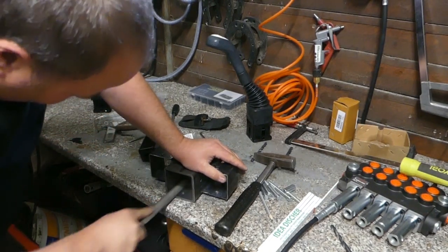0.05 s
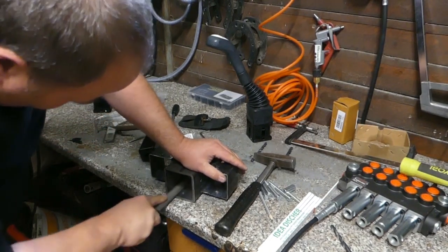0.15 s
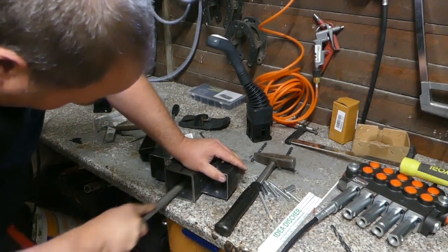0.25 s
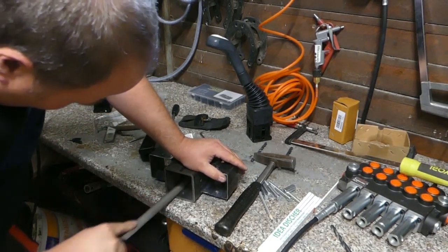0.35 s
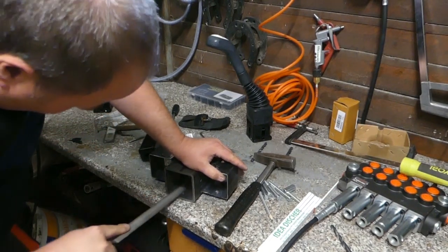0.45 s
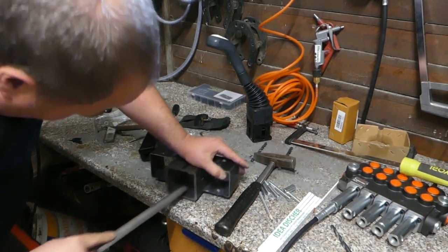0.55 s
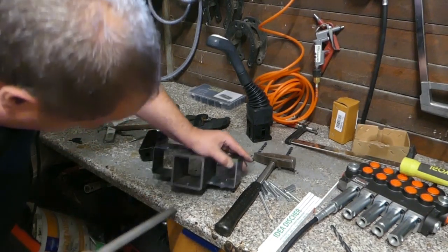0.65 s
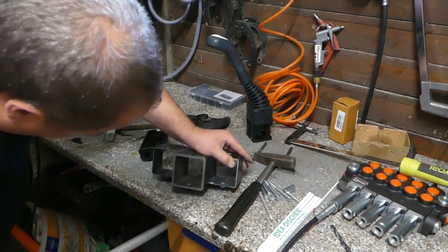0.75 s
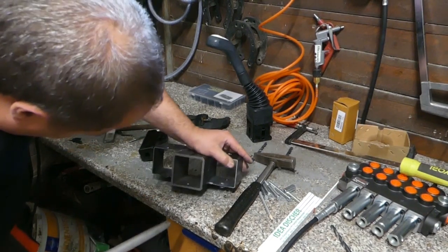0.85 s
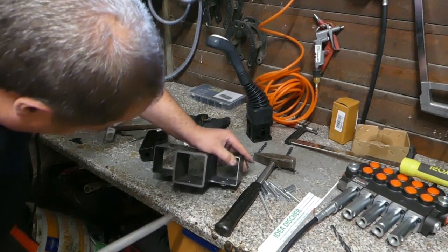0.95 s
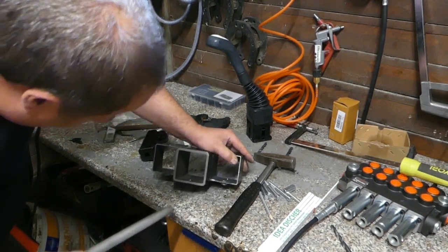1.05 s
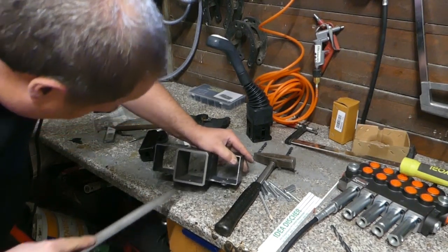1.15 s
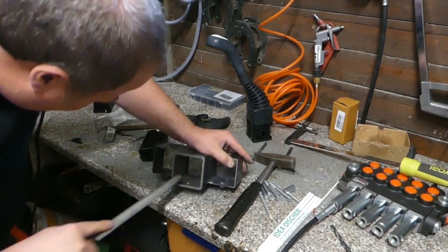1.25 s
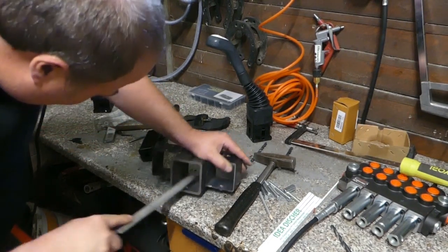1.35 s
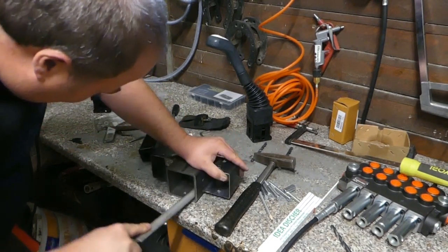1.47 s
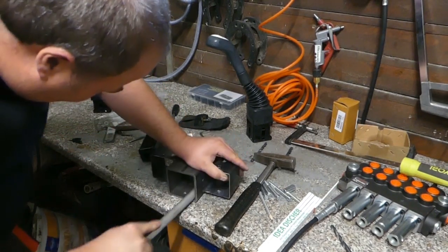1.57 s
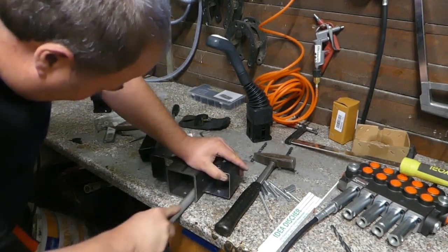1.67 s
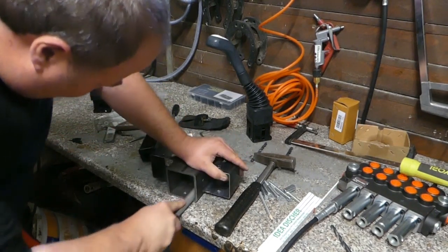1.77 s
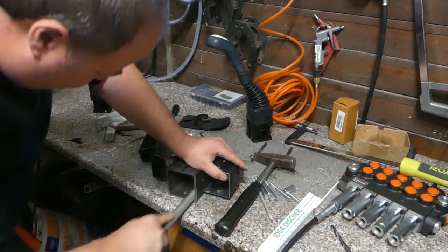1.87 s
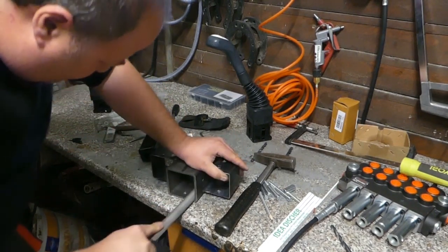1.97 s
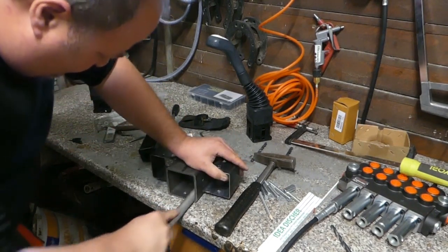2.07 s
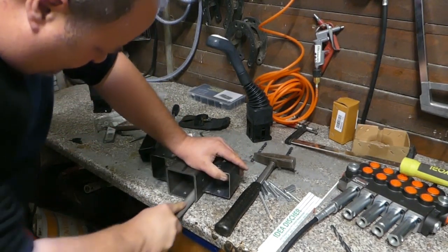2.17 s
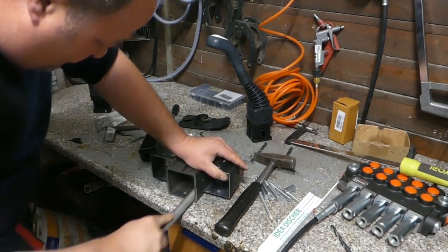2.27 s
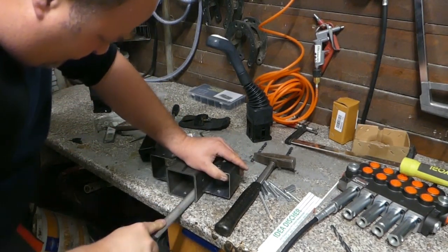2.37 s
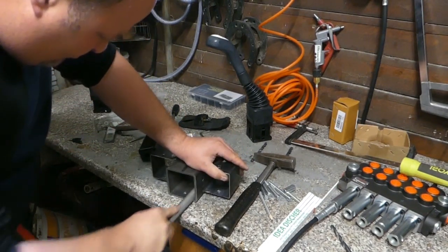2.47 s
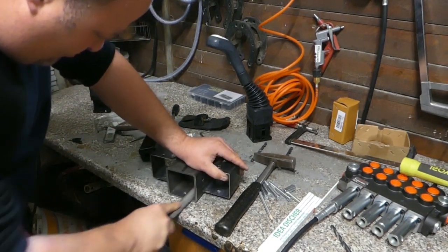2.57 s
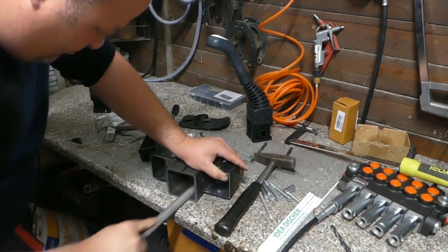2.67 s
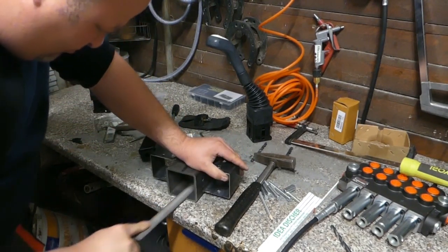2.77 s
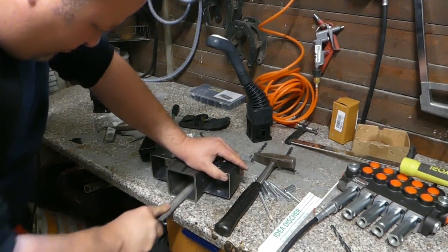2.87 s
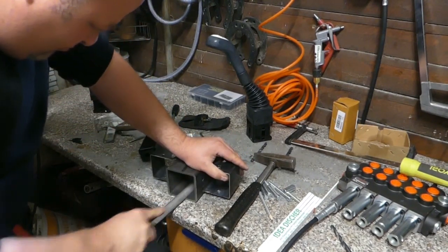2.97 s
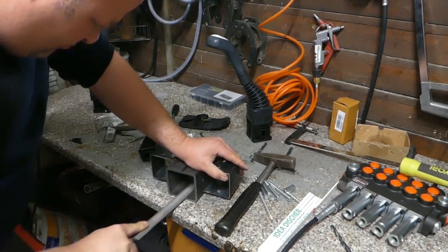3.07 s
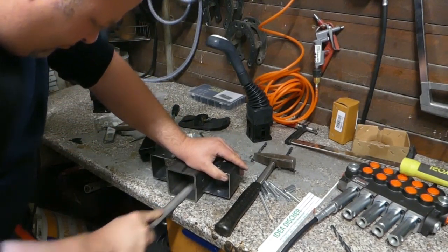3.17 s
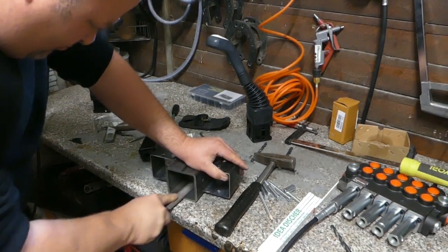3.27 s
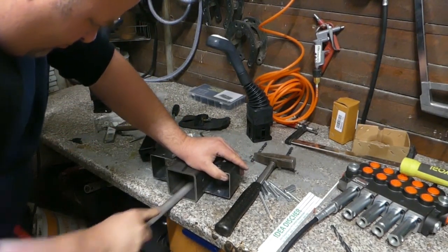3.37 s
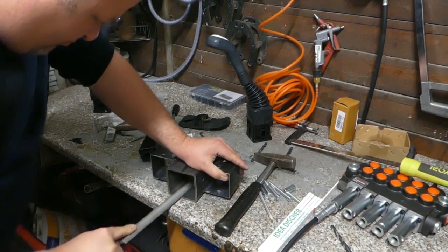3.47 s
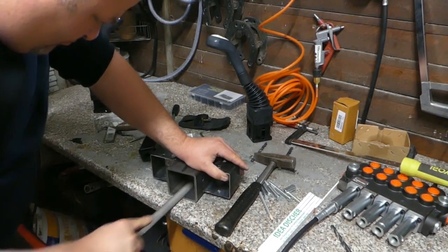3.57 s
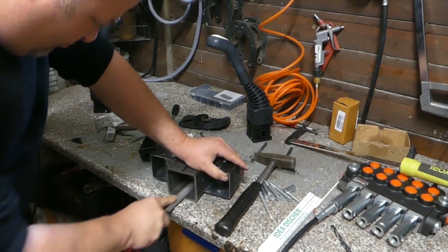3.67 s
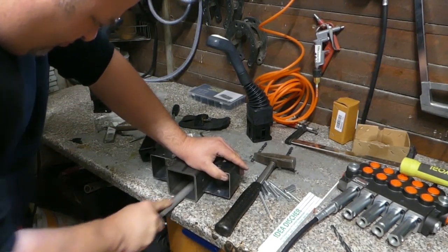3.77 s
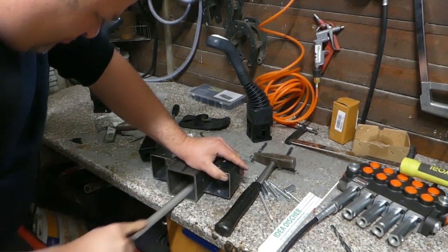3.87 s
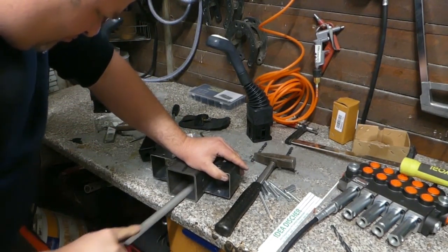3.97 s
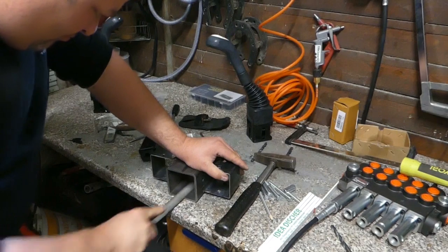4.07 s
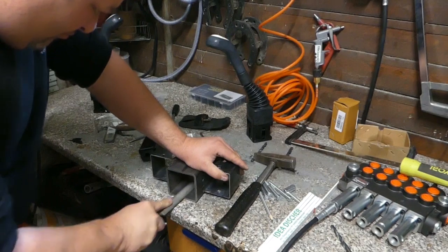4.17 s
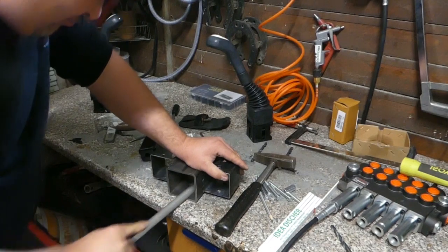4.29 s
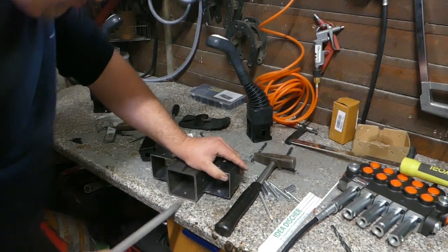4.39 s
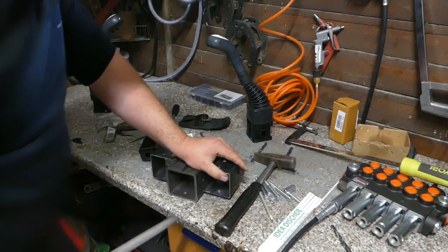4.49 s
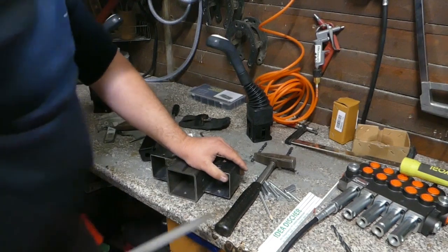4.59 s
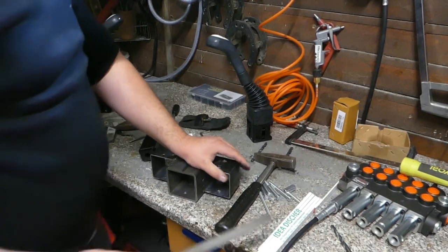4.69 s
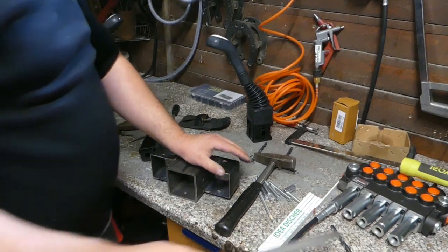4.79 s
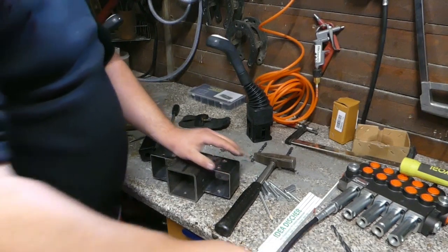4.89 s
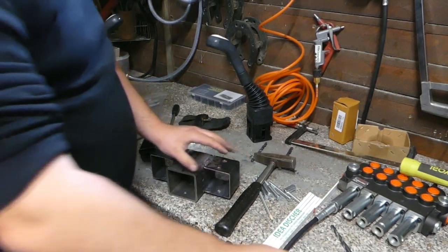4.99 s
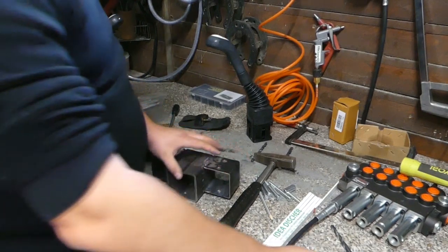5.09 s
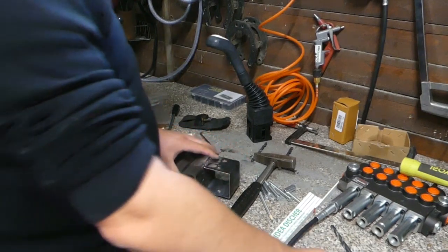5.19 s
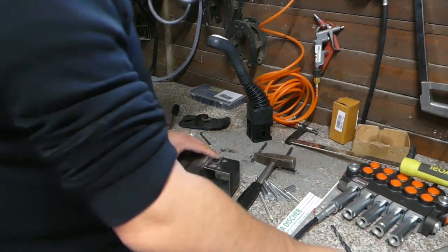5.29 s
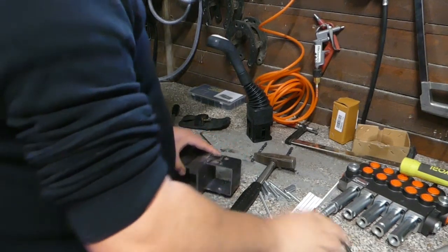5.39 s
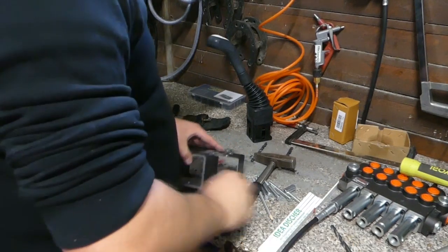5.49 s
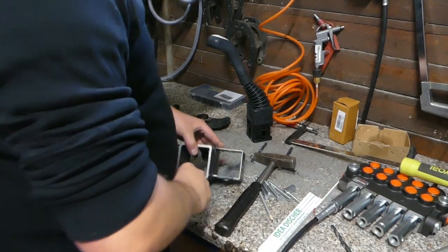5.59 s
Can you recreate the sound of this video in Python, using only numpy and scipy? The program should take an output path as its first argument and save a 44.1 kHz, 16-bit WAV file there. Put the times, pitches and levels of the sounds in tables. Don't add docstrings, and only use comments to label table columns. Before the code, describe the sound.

In a small workshop, a file strokes rapidly inside a hollow steel tube, gritty and squealing. It pauses while the part is shifted and thumped down, then the filing resumes for about three seconds. The file lifts out with a brief ring, a sleeve rustles, and steel clanks sharply on the stone bench. Close stereo camera microphone, faint hum and hiss.

```python
import sys
import numpy as np
from scipy import signal
from scipy.fft import rfft, irfft, next_fast_len
from scipy.io import wavfile
from scipy.ndimage import uniform_filter1d, map_coordinates

SR = 44100
rng = np.random.default_rng(int(sys.argv[2]) if len(sys.argv) > 2 else 0)


def wrap_up_sound(samples):
    columns = np.atleast_2d(samples).T
    tamed = np.clip(columns, -1, 1)
    steps = np.round(tamed * 32767).astype(np.int16)
    wavfile.write(sys.argv[1], SR, steps)


def elevation(decibels):
    levels = np.asarray(decibels, float)
    return 10 ** (levels / 20)


N = 248724


def unit(x):
    return x / np.sqrt(np.mean(x ** 2) + 1e-20)


def level(x, size):
    return np.sqrt(np.abs(uniform_filter1d(x ** 2, size=size)) + 1e-9)


def along(points, hz):
    f, v = np.transpose(points)
    return np.interp(np.log(hz + 1), np.log(f + 1), v)


def wobble(rate):
    return map_coordinates(rng.standard_normal(int(N * rate / SR) + 4), [np.arange(N) * rate / SR])


def control_times():
    return np.arange(0, N + 64, 64) / SR


def smooth(course):
    return np.interp(np.arange(N) / SR, control_times(), course)


def swells(rows, drop_db, rise_shape, fall_shape):
    start, rise, fall = np.transpose(rows)[:3, :, None]
    t = control_times() - start - rise
    rising = t < 0
    lost = np.abs(t / np.where(rising, rise, fall)) ** np.where(rising, rise_shape, fall_shape)
    return elevation(-drop_db * np.minimum(lost, 9))


def filtered(x, response):
    m = next_fast_len(N + SR // 2)
    return irfft(rfft(x, m) * response(np.fft.rfftfreq(m, 1 / SR)), m)[..., :N]


def modes(table):
    def response(f):
        h = 0
        for k, (centre, width, db) in enumerate(table):
            resonance = 1j * f * width / (centre * centre - f * f + 1j * f * width)
            h = h + (-1) ** k * elevation(db) * resonance
        return h / np.sqrt(np.mean(abs(h) ** 2))
    return response


def tuned(family, strength_db):
    return modes([(hz, width, db) for (hz, width), db in zip(family, strength_db)])


def colour(points):
    def response(f):
        cepstrum = irfft(np.log(unit(elevation(along(points, f))) + 1e-6))
        cepstrum[1:len(f)] *= 2
        cepstrum[len(f):] = 0
        return np.exp(rfft(cepstrum))[:len(f)]
    return response


def patchy(depth_db, channels=1):
    z = signal.stft(rng.standard_normal((channels, N + 512)), nperseg=512)[2]
    field = uniform_filter1d(uniform_filter1d(rng.standard_normal(z.shape[1:]), 4, 0), 12, 1)
    return unit(signal.istft(z * elevation(depth_db * unit(field)), nperseg=512)[1][:, :N])


def burst(s, db, length, rise=1e-4):
    out, t = np.zeros(N + SR), np.arange(SR * 3 // 4) / SR
    envelope = elevation(db - 60 * t / length) * (1 - np.exp(-t / rise))
    out[round(s * SR):][:len(t)] = envelope * rng.standard_normal(len(t))
    return out[:N]


def ring(s, db, table, scatter_db):
    out, t = np.zeros(N + SR), np.arange(SR) / SR
    draw = rng.standard_normal((len(table), 2))
    for (hz, mode_db, t60), (a, b) in zip(table, draw):
        envelope = elevation(db + mode_db + scatter_db * a - 60 * t / t60)
        out[round(s * SR):][:SR] += envelope * np.sin(2 * np.pi * hz * t + 3 * b)
    return out[:N]


# [f/Hz, level/dB per Hz]
HUM_AND_HISS = [(12, -89), (20, -51), (143, -16.5), (183, -2.5), (230, -28.5), (264, -7.5), (296, -12),
                (370, -14), (402, -20.5), (613, -24.5), (725, -28.5), (13000, -42), (16300, -41.5)]


def air():
    a, b = filtered(rng.standard_normal((2, N)), colour(HUM_AND_HISS))
    pair = elevation(-53) * np.array([a + 0.93 * b, a - 0.81 * b])
    hum = filtered(pair, lambda f: 1 / (1 + (f / 450) ** 6))
    return pair - hum + hum * elevation(2.1 * wobble(5.76))


# [start t/s, rise/s, fall/s, sleeve level/dB, slide level/dB]
RUSTLE = [
    (0.718, 0.088, 0.1, -48.5, -43),
    (1.334, 0.0089, 0.12, -71, -41.5),
    (1.45, 0.077, 0.023, -65, -60),
    (4.56, 0.056, 0.14, -42, -74),
    (4.85, 0.047, 0.065, -50.5, -62),
    (4.97, 0.05, 0.093, -54.5, -88),
    (5.136, 0.052, 0.057, -48.5, -42),
]
# [f/Hz, level/dB per Hz]
CLOTH = [(590, -30), (1000, -8), (1220, -14), (1340, -11), (3300, -12), (4700, -17), (16000, -25.5)]
# [f/Hz, level/dB per Hz]
SLIDE = [(70, -32), (150, 3), (300, 5.5), (800, -12.5), (2000, -28), (4000, -30)]


def rustle():
    gains = swells(RUSTLE, drop_db=17.5, rise_shape=2.1, fall_shape=0.42)
    cloth, slide = elevation(np.transpose(RUSTLE)[3:]) @ gains
    uneven_db = 2.5
    sleeves = smooth(cloth) * filtered(patchy(uneven_db)[0], colour(CLOTH))
    sliding = smooth(slide) * filtered(patchy(uneven_db)[0], colour(SLIDE))
    return sleeves + sliding


# [t/s, level/dB, contact/s]
THUDS = [
    (0.279, -33, 0.2),
    (1.64, -30, 0.15),
    (2.95, -33, 0.13),
    (.436, -32, 0.14),
    (1.338, -41, 0.053),
    (1.559, -11.5, 0.064),
    (5.43, -33.5, 0.15),
    (5.482, -15, 0.072),
]
# [f/Hz, width/Hz, level/dB]
SLAB = [(120, 160, -19.5), (161, 67, 3), (272, 175, 4.5), (334, 110, 5.5), (448, 86, 4.5), (623, 920, -8.5)]


def thuds():
    force = sum(burst(s, db + 8.0, contact, rise=0.014) for s, db, contact in THUDS)
    return filtered(force, modes(SLAB))


# [t/s, crack level/dB, hum level/dB, bench level/dB, contact/s]
PARTS = [(0.895, -37.5, -77, -51, 0.007), (1.339, -71, -82, -57, 0.004), (1.559, -27, -44, -11.5, 0.0018),
         (5.148, -64, -55, -45, 0.012), (5.165, -64, -53, -45, 0.014), (5.2495, -4.5, -18, -23, 0.011),
         (5.468, -26, -50, -45, 0.0033), (5.476, -40, -37, -31, 0.004), (5.481, -32, -12.5, -8, 0.005),
         (5.488, -34, -18, -9.5, 0.0032), (5.499, -27, -17, -16, 0.0051), (5.513, -6, -38, -27, 0.003),
         (5.516, -15, -42, -12.5, 0.011), (5.538, -13, -26, -20, 0.004), (5.546, -16, -37, -27, 0.0047),
         (5.556, -22, -36, -23.5, 0.011), (5.569, -23, -20, -21.5, 0.0075), (5.585, -28, -25, -22, 0.0063),
         (5.6, -28, -35, -25, 0.015)]
# [t/s, ring level/dB, rattle level/dB]
CLANK = (5.249, -1.4, -31)
# [f/Hz, width/Hz, level/dB]
STEEL = [(2570, 270, -7), (2810, 110, 0), (4080, 124, 1.5), (4270, 150, 0.5), (5180, 190, -1.5),
         (5500, 140, -2), (6850, 170, -3.5), (7800, 180, -5.5), (8200, 120, -4), (9560, 170, -10)]
# [f/Hz, width/Hz, level/dB]
BAR = [(480, 81, -4.5), (544, 60, -4.5), (764, 42, 2.5), (818, 39, 3), (1080, 56, -9), (1320, 110, -12),
       (1670, 370, -13.5)]
# [f/Hz, width/Hz, level/dB]
BENCH = [(246, 54, -5.5), (429, 115, 1.5), (560, 123, 1.5), (960, 331, 1), (1400, 380, -3.5),
         (1970, 370, -6), (2820, 1600, -20.5)]
# [f/Hz, level/dB per Hz]
GRIT = [(59, -63), (100, -20), (330, -22), (445, -11), (1140, -19), (1260, -15.5), (1740, -14.5),
        (2400, -7.5), (2720, -11.5), (5510, -6.5), (11400, -18.5), (15300, -24), (16300, -12)]


def parts():
    s, ring_db, rattle_db = CLANK
    rattle = burst(s, rattle_db, 0.5)
    hum = burst(s, rattle_db + 4.5, 1.35)
    steel = burst(s, ring_db - 4, 0.017) + elevation(3.0) * rattle
    drive = np.array([steel, elevation(-7.0) * rattle, hum, elevation(7.0) * rattle])
    for s, crack_db, hum_db, bench_db, contact in PARTS:
        drive[1] += burst(s, crack_db - 10.0, 3 * contact)
        drive[2:] += elevation([[hum_db + 3.5], [bench_db + 5]]) * burst(s, 0, 5 * contact, rise=0.0015)
    bodies = modes(STEEL), colour(GRIT), modes(BAR), modes(BENCH)
    return filtered(drive, lambda f: np.array([body(f) for body in bodies])).sum(0)


# [t/s, peak level/dB, wall/dB over it, bending/dB over it, contact/s]
KNOCKS = [
    (1.5205, 1.5, -24, -45, 0.035),
    (2.128, -7, -12, -24, 0.036),
    (2.127, -2, -16, -28, 0.005),
]
# [t/s, peak level/dB, wall/dB over it, bending/dB over it, contact/s]
CATCHES = [(0.147, -13, -9, -23, 0.048), (0.436, -5.5, -29, -15, 0.024), (1.718, -8, -6, -15.5, 0.043),
           (1.949, -12, -8.5, -30, 0.079), (2.204, -13.5, -3, -16, 0.043), (2.548, -11, -9, -19.5, 0.037),
           (2.928, -18, -17, -16, 0.023), (3.085, -25, -14, -28, 0.014), (3.13, -21.5, -4, -15, 0.058),
           (3.25, -18.5, 6, -14, 0.036), (3.452, -19, -1, -26, 0.023), (3.668, -22.5, 2, -33, 0.036),
           (4.0, -14, -10, -24, .03)]
# [t/s, level/dB]
LIFT = [
    (4.52, -17),
]
# [f/Hz, width/Hz, level/dB]
TANG = [(458, 80, 6), (860, 90, 11), (960, 90, 11), (1260, 200, 8), (1500, 200, 14), (1800, 220, 11)]
# [f/Hz, width/Hz]
WALL = [(2075, 36), (2125, 25), (2275, 30), (2360, 24), (2405, 36), (2480, 45), (2555, 40)]
# [file at mouth/dB, file deep/dB]
WALL_DB = [(-9, -10), (-13, -16), (-14, -10), (-1, -5), (-6, -5), (-10, -1), (-19, -9)]
# [f/Hz, width/Hz]
LOW = [(446, 40), (620, 50), (787, 30), (933, 35), (1043, 28), (1255, 28), (1360, 35)]
LOW_DB = [3, 1.5, -16, 10, 8, 12.5, -15]
# [f/Hz, width/Hz]
PLATES = [(3120, 110), (3505, 20), (3832, 30), (4110, 20), (4420, 25), (4590, 25), (4652, 20), (5270, 25),
          (5692, 30), (6382, 20), (6758, 20), (7102, 22), (8680, 30), (8940, 30), (9095, 20), (9670, 50),
          (11230, 50), (11790, 50)]
# [file at mouth/dB, file deep/dB]
PLATES_DB = [(5.5, -57), (-39, -1), (7.5, -26), (10.5, 0), (13, -3), (-10, 14.5), (14.5, 9), (11, 22.5),
             (-12, -18), (-20, -34), (11.5, 7.5), (6.5, 6), (6, 7), (-8.5, 2), (4.5, 13.5), (-24, -20),
             (0, 1), (-44, -19)]


def knocks():
    drive = np.zeros((4, N))
    for table, rise, bench_db in ((KNOCKS, 0.0003, -41.5), (CATCHES, 0.006, -28.5)):
        for s, db, wall_db, low_db, contact in table:
            shares = elevation([[-6.5], [wall_db + 11.5], [low_db + 14.5], [bench_db + 17.5]])
            drive += shares * burst(s, db, contact, rise)
    walls, plates = tuned(WALL, np.mean(WALL_DB, 1)), tuned(PLATES, np.mean(PLATES_DB, 1))

    def tube(f):
        crisp = (1j * f / 1900) ** 2 / (1 + 1j * f / 1900) ** 2
        contact = (colour(GRIT)(f) + plates(f)) * crisp
        return np.array([contact, walls(f), tuned(LOW, LOW_DB)(f), modes(SLAB)(f)])

    out = filtered(drive, tube).sum(0)
    for s, db in LIFT:
        out = out + filtered(burst(s, db + 10.0, 0.0049) + burst(s, db - 1.5, 0.11), modes(TANG))
    return out


def locked(hz, family):
    mode_hz = np.transpose(family)[0]
    nearest = mode_hz[np.argmin(np.abs(hz[:, None] - mode_hz), axis=1)]
    return np.where(np.abs(hz / nearest - 1) < 0.05, nearest, hz)


# [t/s, length/s, f/Hz, level/dB]
SING_LOW = [(0, 0.072, 1043, -34), (0.054, 0.12, 1255, -30), (0.165, 0.064, 1255, -28.5),
            (0.225, 0.067, 1255, -33.5), (0.15, 0.017, 450, -27), (0.18, 0.08, 450, -35),
            (0.19, 0.1, 580, -37), (0.32, 0.033, 1255, -31), (0.336, 0.037, 790, -29),
            (0.364, 0.054, 925, -32), (0.388, 0.029, 994, -24), (0.429, 0.023, 1261, -28),
            (0.431, 0.021, 450, -23), (1.7, 0.077, 1250, -29.5), (1.713, 0.013, 452, -34),
            (1.938, 0.04, 920, -32.5), (1.925, 0.074, 450, -43), (1.967, 0.11, 1247, -34),
            (2.02, .07, 1046, -29), (2.126, 0.03, 1240, -29), (2.2, 0.055, 1250, -32.5),
            (2.33, 0.036, 451, -30), (2.373, 0.08, 1250, -30), (2.405, 0.043, 1006, -28),
            (2.41, 0.015, 875, -28.5), (2.7, 0.15, 1261, -30.5), (2.701, 0.02, 453, -30),
            (2.732, 0.019, 454, -29), (2.728, 0.042, 787, -31), (2.726, 0.06, 1043, -31),
            (2.779, 0.087, 1360, -32), (2.947, 0.037, 1290, -27), (2.985, 0.025, 942, -25),
            (3.016, 0.023, 1043, -31), (3.0, .025, 447, -32), (3.067, 0.012, 458, -27.5),
            (3.12, .05, 1280, -38), (3.244, 0.037, 787, -26.5), (3.256, 0.028, 925, -34),
            (3.309, 0.041, 1240, -22.5), (3.29, 0.031, 1360, -28), (3.546, 0.048, 1255, -29.5),
            (3.691, 0.054, 1290, -34.5), (3.739, 0.059, 1230, -28), (3.699, 0.019, 1560, -28),
            (3.78, 0.032, 805, -29), (3.92, 0.058, 1240, -36), (3.87, .09, 1052, -39),
            (4.207, 0.032, 931, -23), (4.23, 0.016, 777, -25), (4.197, .04, 1260, -29.5),
            (4.345, 0.04, 1270, -29.5), (4.345, 0.023, 1044, -29), (4.432, 0.019, 1246, -29),
            (4.468, 0.045, 460, -31)]
# [t/s, length/s, f/Hz, level/dB]
SING_WALL = [(0, 0.096, 2386, -30), (0, 0.09, 2120, -33), (.15, 0.22, 2124, -31),
             (0.198, 0.071, 2400, -27.5), (0.404, .05, 2354, -27), (0.398, 0.061, 2080, -27),
             (1.521, 0.014, 2405, -18.5), (1.522, 0.018, 2125, -24.5), (1.56, 0.092, 2420, -27),
             (1.711, 0.033, 2382, -16), (1.799, 0.054, 2440, -26), (1.937, 0.037, 1920, -27.5),
             (1.979, 0.072, 2360, -21.5), (2.126, 0.023, 2402, -18), (2.203, 0.03, 2056, -24),
             (2.16, 0.03, 2360, -24), (2.201, 0.045, 2410, -30), (2.556, 0.019, 2480, -14),
             (2.588, 0.022, 2400, -18), (2.692, 0.055, 2070, -20.5), (2.718, 0.03, 2350, -18.5),
             (2.751, 0.031, 2360, -16.5), (2.925, 0.054, 2480, -18.5), (3.122, 0.034, 2370, -19),
             (3.123, 0.037, 2520, -27), (3.139, .02, 2068, -20), (3.242, 0.057, 2360, -21),
             (3.279, 0.058, 2480, -24), (3.27, 0.032, 1870, -34), (3.451, 0.064, 2374, -19.5),
             (3.46, 0.044, 2480, -30), (3.69, 0.036, 2480, -19.5), (3.706, .09, 1735, -36.5),
             (3.75, 0.044, 2490, -23), (3.94, .04, 2490, -22.5), (3.94, 0.033, 2052, -21.5),
             (4.005, 0.034, 2360, -29), (4.145, 0.024, 2490, -20), (4.162, 0.035, 1884, -32.5),
             (4.358, 0.067, 2458, -20), (4.356, 0.087, 2075, -26), (4.463, 0.017, 2075, -23),
             (4.469, 0.055, 2480, -17)]
# [t/s, length/s, f/Hz, level/dB]
SING_PLATE = [(0, .06, 5250, -31.5), (0, 0.064, 3800, -34), (0.141, 0.11, 3170, -51),
              (.17, 0.09, 4570, -35), (.35, 0.16, 3100, -31.5), (.37, .06, 4590, -34),
              (.43, 0.067, 3832, -36), (.55, 0.13, 3832, -46), (2.55, 0.029, 3505, -29),
              (2.747, 0.068, 6960, -29.5), (2.925, 0.064, 3460, -26), (3.091, 0.057, 4110, -28),
              (3.104, 0.03, 3700, -28), (3.1, 0.035, 5270, -36), (3.122, 0.15, 4600, -36.5),
              (3.25, .015, 3500, -30), (3.29, 0.038, 3500, -25), (3.47, 0.065, 6950, -30),
              (3.69, .06, 3460, -37), (3.889, 0.064, 5200, -26.5), (4.2, 0.037, 3480, -40),
              (4.171, .04, 7100, -31), (4.18, .03, 6380, -29), (4.421, 0.13, 4500, -30),
              (4.45, 0.062, 5700, -25)]
# [f/Hz, level/dB, t60/s]
FREE = [(1258, -29, 1.1), (4653, -17, 1.1), (4425, -26, .4), (4560, -28, .3), (1475, -16, .2),
        (1600, -18, .2)]


def singing():
    swell_s, tail_t60_s, drift_hz = 0.01, 0.033, 13
    out, t = np.zeros(N + SR), np.arange(SR // 3) / SR
    drift, stutter = wobble(120), elevation(2.8 * wobble(70))
    start, lasts, near_hz, strength_db = np.transpose(SING_LOW + SING_WALL + SING_PLATE)
    mode_hz = locked(near_hz, LOW + WALL + PLATES)
    for s, length, hz, db in zip(start, lasts, mode_hz, strength_db):
        at = slice(round(s * SR), round(s * SR) + len(t))
        swing_hz = drift_hz * min((hz / 1200) ** 1.56, 3.5) * np.roll(drift, round(hz))[at]
        turn = 2 * np.pi * (np.cumsum(hz + swing_hz) / SR + rng.random())
        hold = np.clip(t / swell_s, 0, 1) ** 2 * elevation(-60 * np.clip(t - length, 0, 1) / tail_t60_s)
        out[at] += elevation(db) * hold * np.roll(stutter, round(hz) * 7)[at] * np.sin(turn)
    return out[:N] + sum(ring(s, db, FREE, 0) for s, db in LIFT)


# [start t/s, rise/s, fall/s, grit level/dB, wall ring/dB over grit]
STROKES = [(0, 0.0013, 0.091, -19.5, 0), (0.111, 0.1, 0.09, -18, -11.5), (0.318, 0.098, 0.088, -21, 2.5),
           (.56, 0.02, 0.09, -31, -9), (1.531, 0.07, 0.17, -30, 1.5), (1.668, 0.085, 0.22, -20.5, -2.5),
           (1.914, 0.092, 0.11, -18.5, 0.5), (2.129, 0.0068, 0.19, -20, -12), (2.319, 0.092, 0.1, -23, 2),
           (2.519, 0.047, .11, -19, -0.5), (2.68, 0.1, 0.12, -20.5, -0.5), (2.889, 0.066, 0.12, -22, 6),
           (3.065, 0.05, 0.082, -19.5, 2), (3.234, 0.078, 0.12, -19.5, 0), (3.42, 0.065, 0.15, -21, 3),
           (3.649, 0.062, 0.16, -18.5, -0.5), (3.863, 0.089, 0.16, -21.5, 3), (4.101, 0.096, 0.081, -19, 1),
           (4.301, 0.15, 0.12, -20.5, 1.5)]
# [t/s, depth 0 mouth to 1 deep]
BEARING = [(0, 0.098), (.2, 0.7), (.33, 0.099), (1.57, 0.2), (1.8, 0.044), (2.14, 0.02), (2.36, 0),
           (2.56, 0.63), (2.69, 0.084), (2.94, 0.56), (3.13, 0.56), (3.3, 0.86), (3.55, 0.42), (3.72, 0.74),
           (4.0, 0.46), (4.17, 0.79), (4.31, 0.8), (4.5, 0.42)]


def strokes():
    start, rise, _, grit_db, wall_db = np.transpose(STROKES)
    t = np.arange(N) / SR
    gains = swells(STROKES, drop_db=13.5, rise_shape=3.12, fall_shape=1.38)
    pressure = smooth(np.linalg.norm(elevation(grit_db)[:, None] * gains, axis=0))
    resting = ((t > 0) & (t < 0.62)) | ((t > 1.53) & (t < 4.5))
    pressure = np.hypot(pressure, elevation(-38) * resting)
    return pressure, np.interp(t, start + rise, wall_db), np.interp(t, *np.transpose(BEARING))


# [t/s, length/s, level/dB, from f/Hz, to f/Hz]
TEETH = [
    (0.332, 0.097, -27.5, 760, 1250),
    (1.95, 0.12, -33.5, 702.4, 1250),
    (2.54, 0.093, -33.5, 1041, 620),
    (2.7, 0.068, -27.5, 480, 1320),
    (2.945, 0.13, -33.5, 1300, 460),
    (3.24, 0.07, -29, 790, 1260),
    (3.779, 0.0461, -32, 800, 900),
    (4.089, .04, -33.5, 628.5, 620),
    (4.165, 0.1, -31, 1300, 560),
    (4.341, 0.036, -32, 1041, 1255),
]


def chatter_course(pressure):
    s, length, db, from_hz, to_hz = np.transpose(TEETH)
    t = control_times()
    knots = np.maximum.accumulate(np.ravel([s, s + length], order="F"))
    pace = np.interp(t, knots, locked(np.ravel([from_hz, to_hz], order="F"), LOW))
    inside = np.minimum(t - s[:, None], (s + length)[:, None] - t) / 0.041
    strength = smooth(elevation(db) @ np.clip(inside + 0.5, 0, 1)) + elevation(-28) * pressure
    return smooth(pace), strength


def filing():
    pressure, wall_db, depth = strokes()
    pace, strength = chatter_course(pressure)
    glide = uniform_filter1d(np.abs(np.gradient(pace)) * SR, size=1500)
    rough = 0.02 + 0.14 * np.clip(glide / 4000, 0, 1)
    turn = 2 * np.pi * np.cumsum(pace * (1 + rough * wobble(250))) / SR
    bite = elevation(1.17 * wobble(35) + 1.36 * wobble(140))
    chips = elevation(4.0 * np.minimum(rng.exponential(size=N), 3.2))
    grit = unit(patchy(2.6)[0] * (1 + 0.069 * np.cos(turn)) * bite * chips)
    force = pressure * grit

    angle = np.clip(depth, 0, 1) * np.pi / 2
    mouth_and_deep = np.cos(angle), np.sin(angle)

    def bearing(x, family, strengths):
        pairs = zip(mouth_and_deep, np.transpose(strengths))
        return sum(filtered(x * share, tuned(family, db)) for share, db in pairs)

    push = patchy(0.83)[0]
    push = push / level(bearing(push, WALL, WALL_DB), size=1800)
    wall_gain = elevation(wall_db - 5.0 + 1.58 * wobble(22.25))
    walls = bearing(pressure ** 1.031 * wall_gain * push * bite, WALL, WALL_DB)

    def bending(f):
        return elevation(2.5) * tuned(LOW, LOW_DB)(f) + elevation(18.0) * (f > 300) / (1 + (f / 1700) ** 6)

    teeth = unit(np.sin(turn) * bite) + 0.2 * grit
    teeth = teeth / level(filtered(teeth, bending), size=3500)
    chatter = filtered(strength * elevation(-3.5) * teeth, bending)

    ground = elevation(-11.0) * bearing(force, PLATES, PLATES_DB) + elevation(-2.0) * filtered(force, colour(GRIT))
    fizz = filtered(ground, lambda f: 1 / (1 + (9000 / (f + 1)) ** 4))
    ground = ground + fizz * ((pressure / elevation(-20.5)) ** 0.79 - 1)
    return ground + walls + chatter


# [f/Hz, t60/s]
SHOP = [(150, 0.86), (800, 0.55), (3000, 0.4), (8000, 0.35), (15000, 0.021)]
# [f/Hz, level/dB]
WET = [(150, -3), (800, 1), (3000, -2), (6000, -5.5), (9000, -2.5), (13000, 2.5)]


def shop(x):
    hz, t, z = signal.stft(rng.standard_normal((2, SR * 2 // 3)), SR, nperseg=256)
    shape = elevation(-60 * t / along(SHOP, hz)[:, None])
    shape *= elevation(along(WET, hz))[:, None] / np.sqrt(np.sum(shape ** 2, 1, keepdims=True) * 128)
    tail = signal.istft(z * shape, SR, nperseg=256)[1]
    tail = tail + 0.45 * tail[::-1]
    return signal.fftconvolve(np.pad(x, (250, 0))[None], tail, axes=1)[:, :N]


# [f/Hz, level/dB to the right]
FILE_PAN = [(300, -0.4), (700, 1.2), (2500, 1.2), (4500, 0), (9000, -.3)]


def scene():
    file = filing() + knocks() + thuds() + rustle()
    song, laid = singing(), parts()
    tube = filtered(file + song, lambda f: elevation([[-1], [1]] * along(FILE_PAN, f)))
    direct = tube + laid * elevation([[-1.6], [1.6]])
    room = shop(file + laid + elevation(-7) * song)
    return elevation(-1) * (direct + room) + air()


def band_limit(x):
    return signal.sosfilt(signal.butter(12, 15950, fs=SR, output="sos"), x)


# [f/Hz, level/dB]
MIC = [(1000, 0), (7000, 0), (7900, -6), (8800, 0), (12000, -1), (15000, -4), (15750, -7), (15950, -40)]


def record(dry):
    x = filtered(dry, lambda f: elevation(along(MIC, f)) * (1j * f / 90) ** 2 / (1 + 1j * f / 90) ** 2)
    rumble = filtered(rng.standard_normal((2, N)), lambda f: 1 / (1 + (f / 60) ** 4))
    return band_limit(x + elevation(-57) * rumble)


dry = scene()
out = record(dry)
wrap_up_sound(out)
```